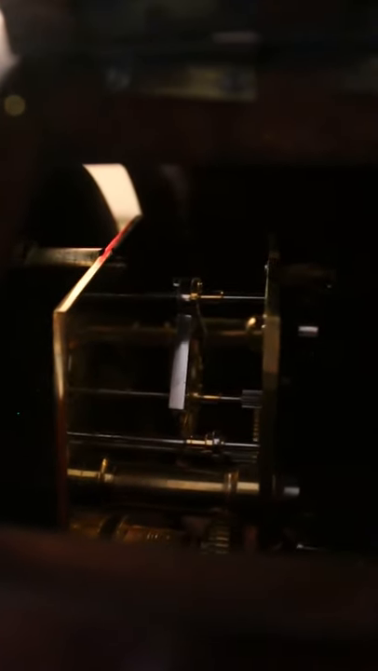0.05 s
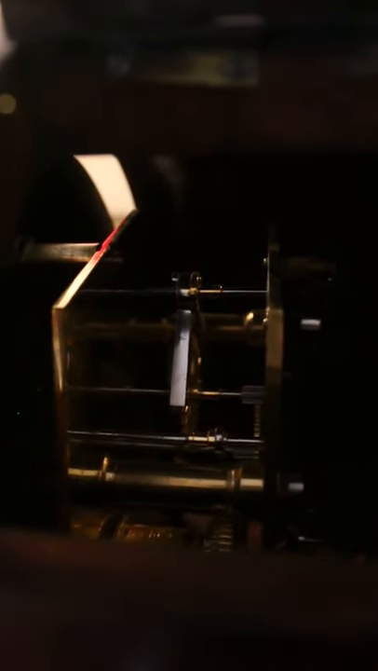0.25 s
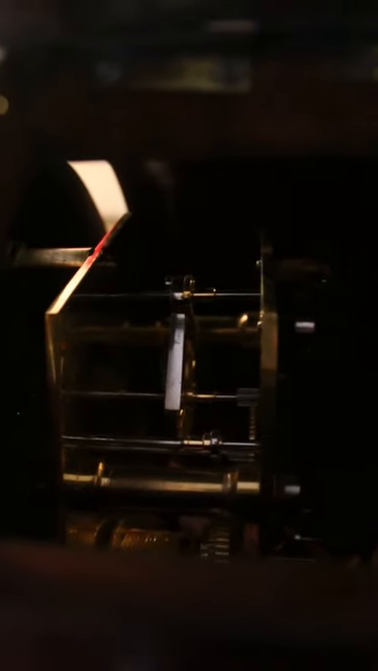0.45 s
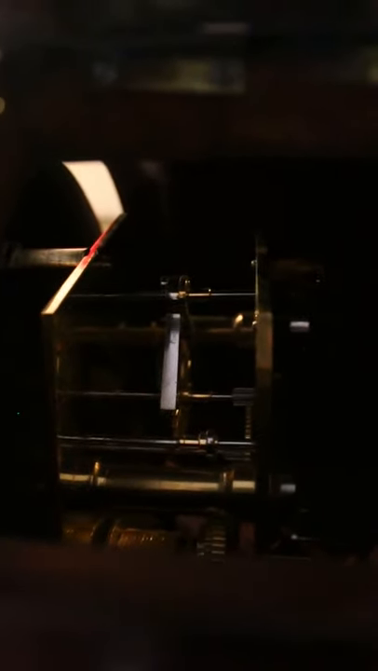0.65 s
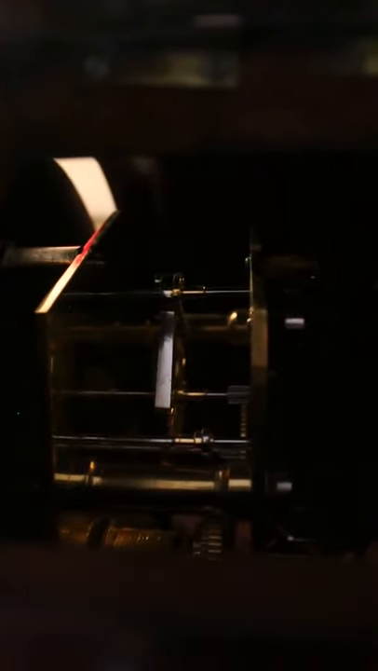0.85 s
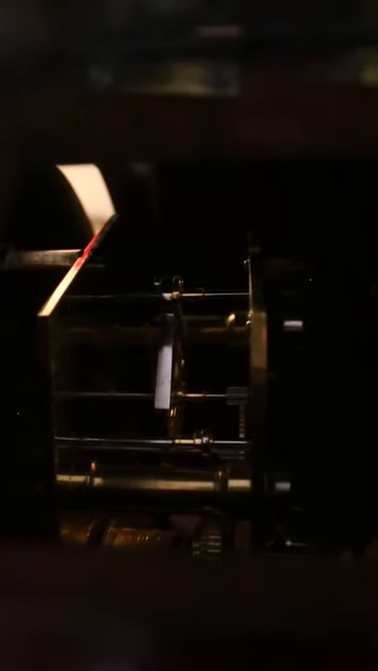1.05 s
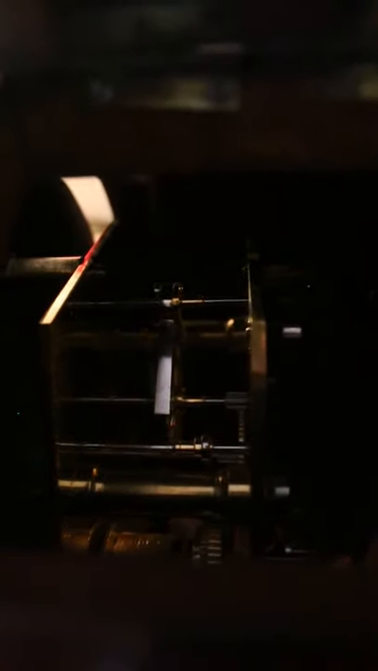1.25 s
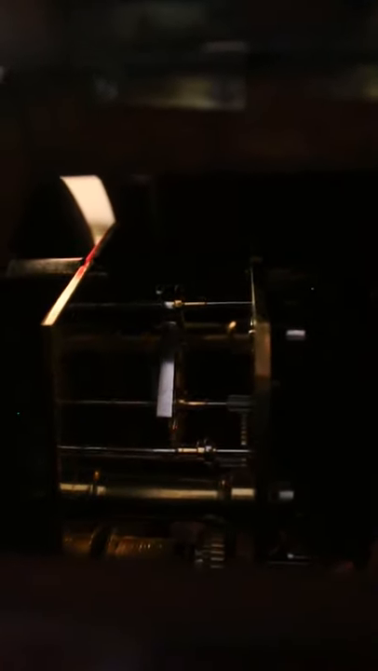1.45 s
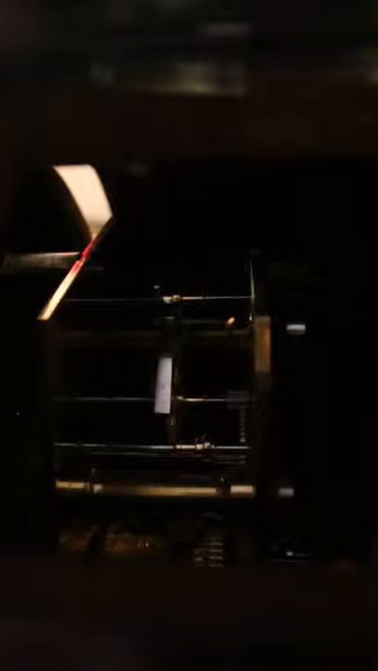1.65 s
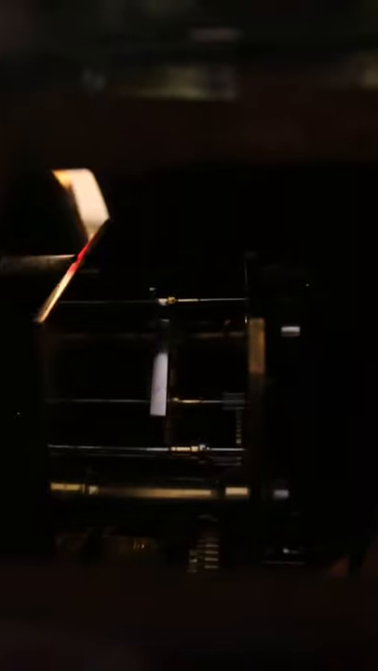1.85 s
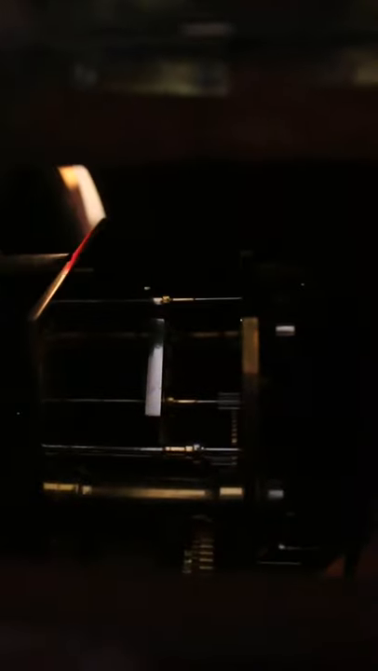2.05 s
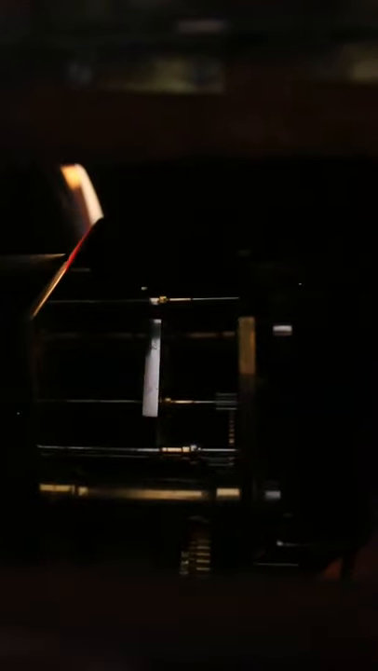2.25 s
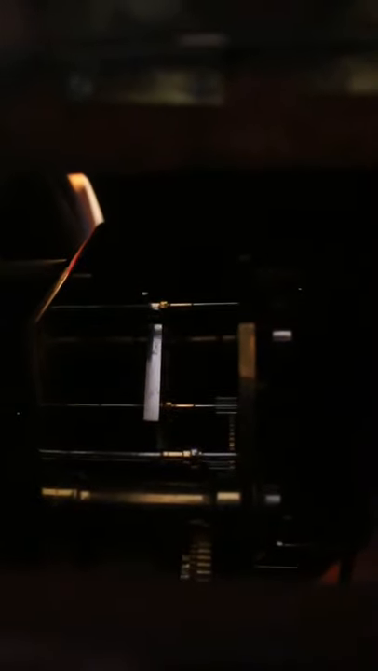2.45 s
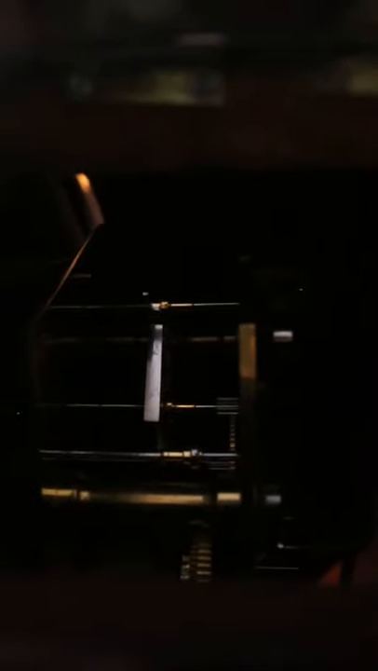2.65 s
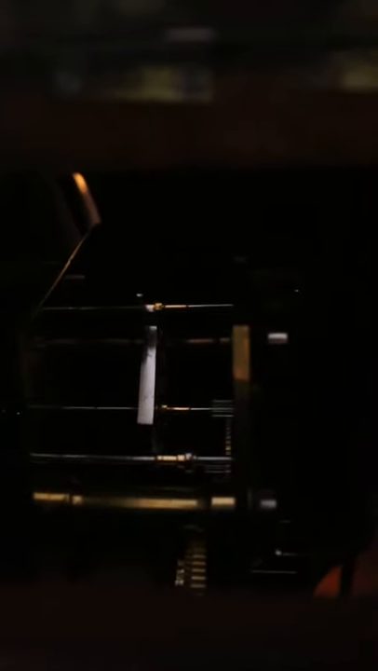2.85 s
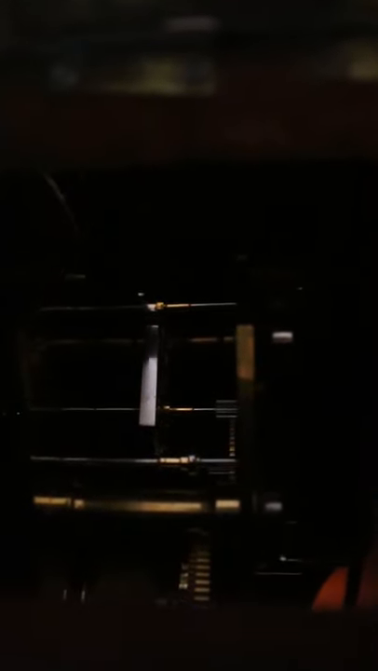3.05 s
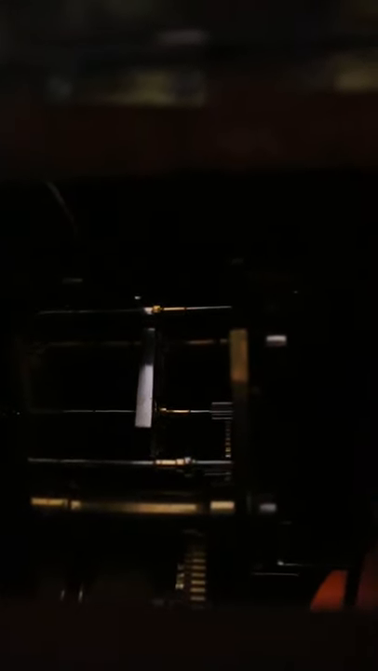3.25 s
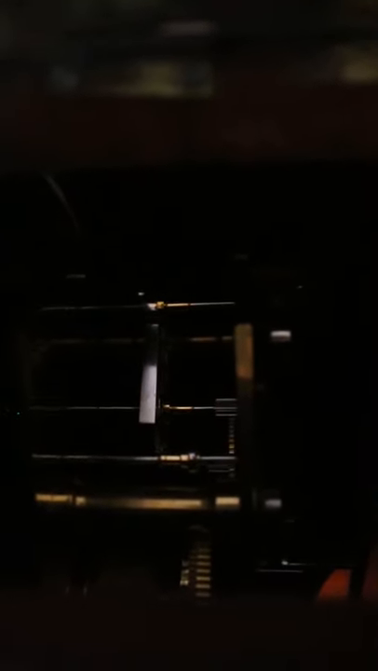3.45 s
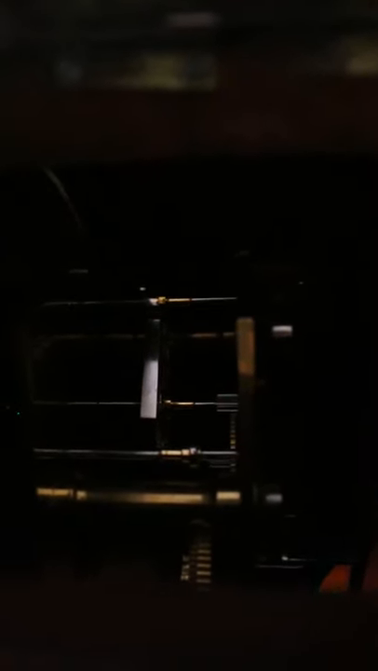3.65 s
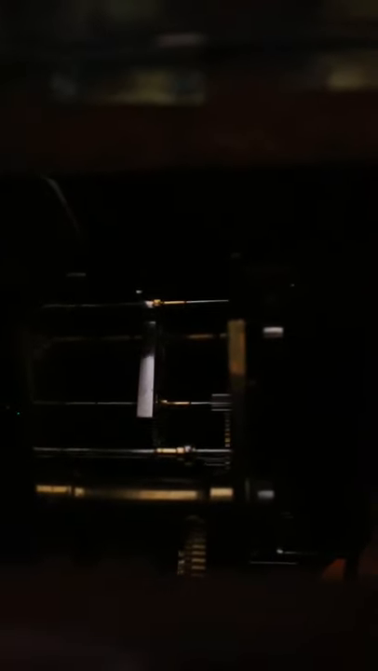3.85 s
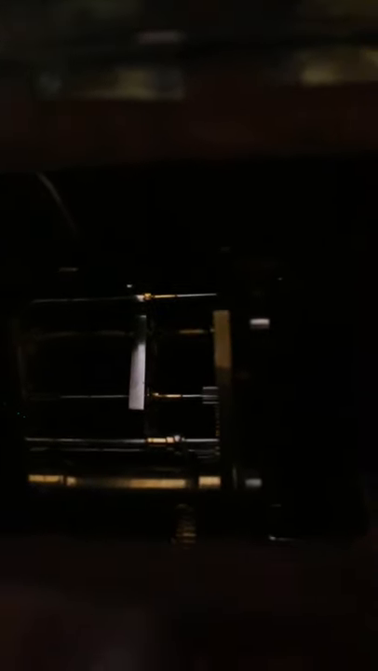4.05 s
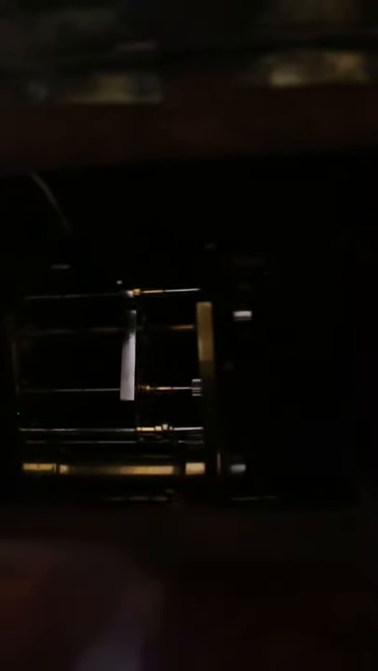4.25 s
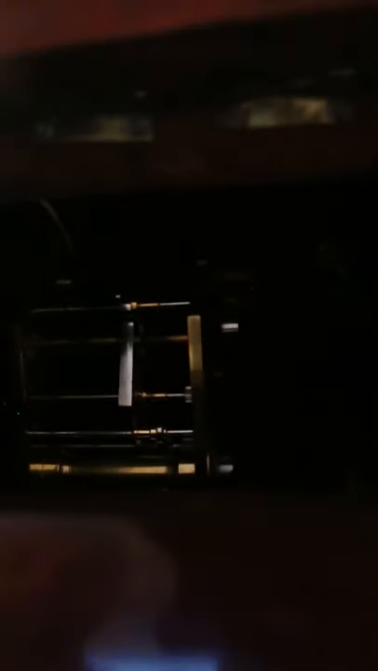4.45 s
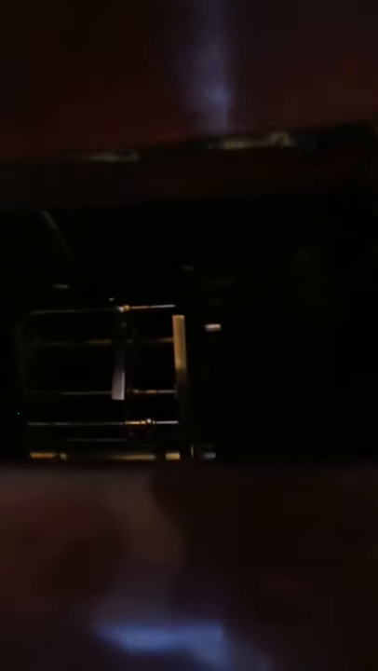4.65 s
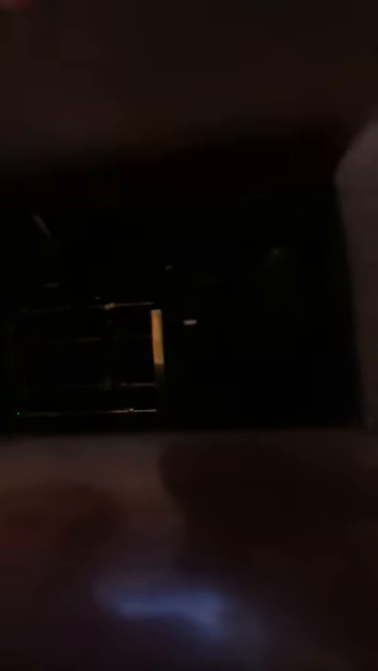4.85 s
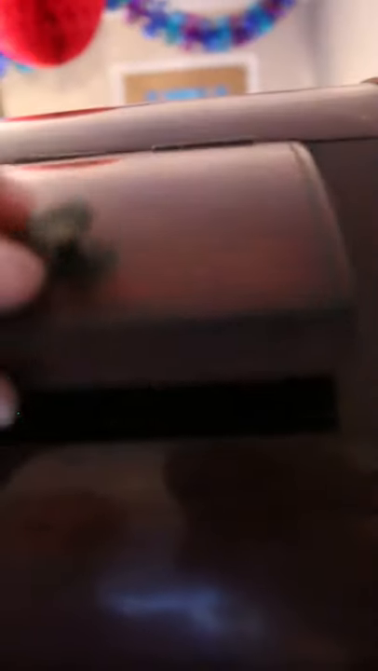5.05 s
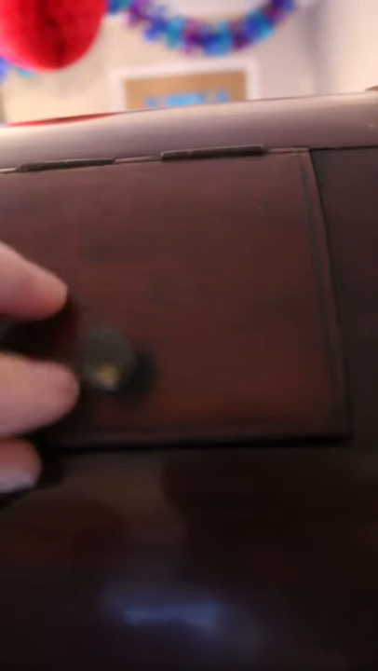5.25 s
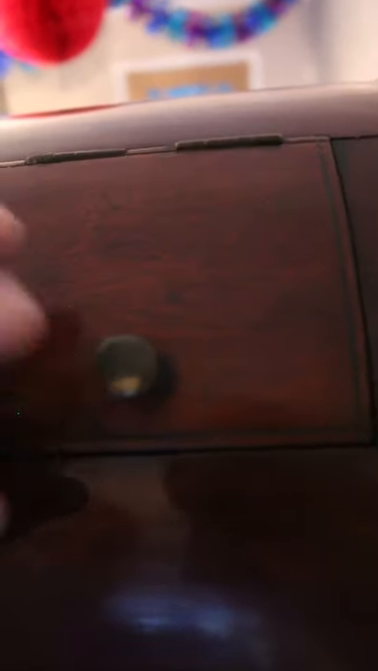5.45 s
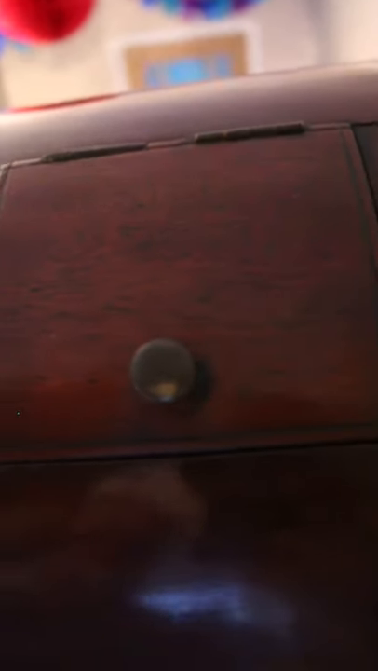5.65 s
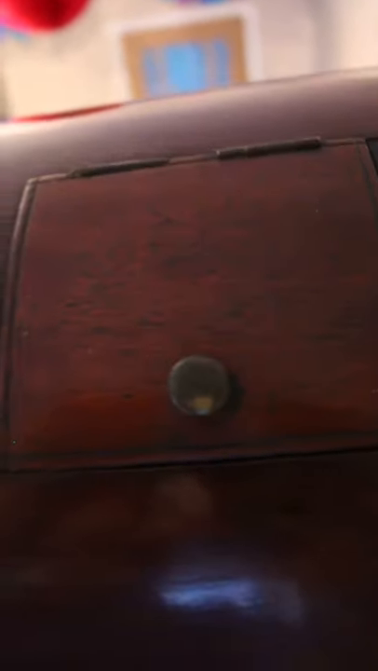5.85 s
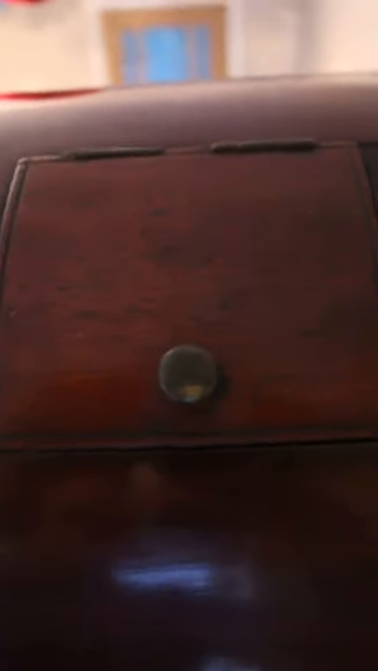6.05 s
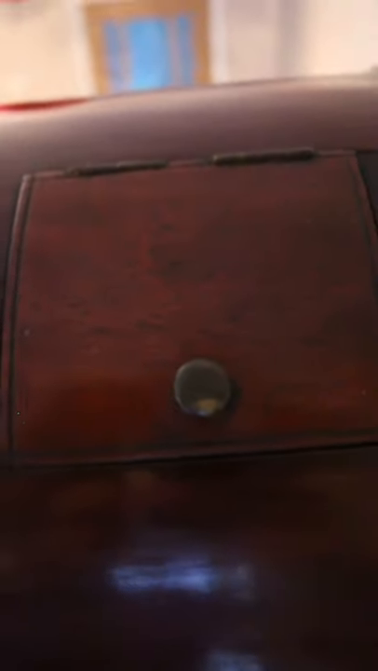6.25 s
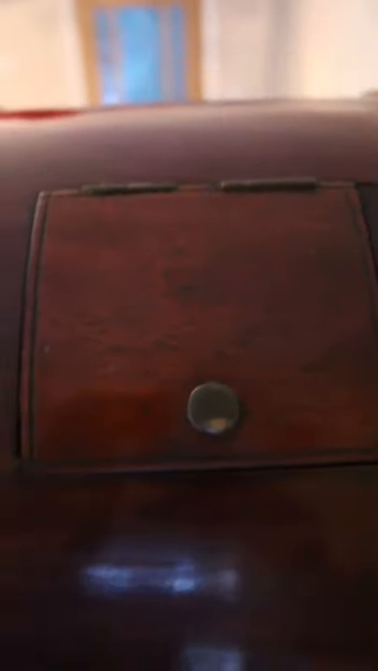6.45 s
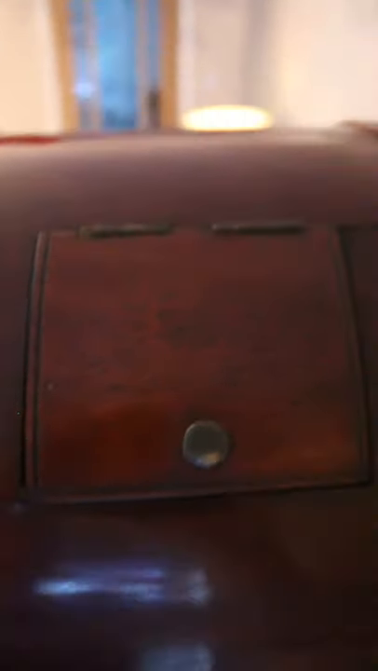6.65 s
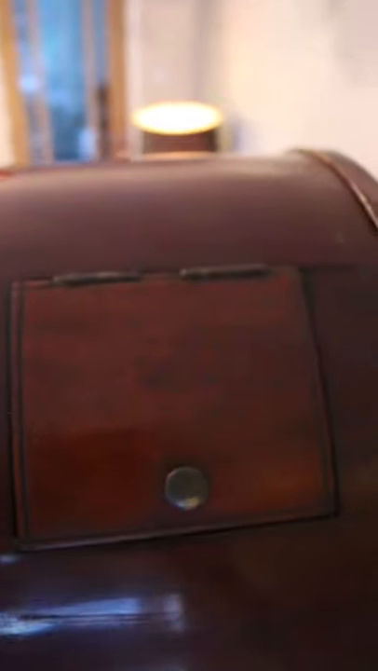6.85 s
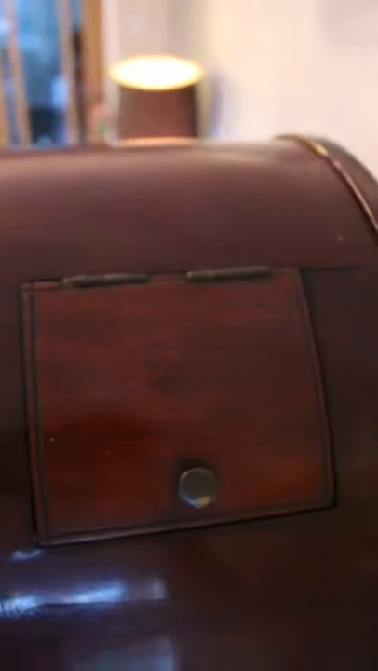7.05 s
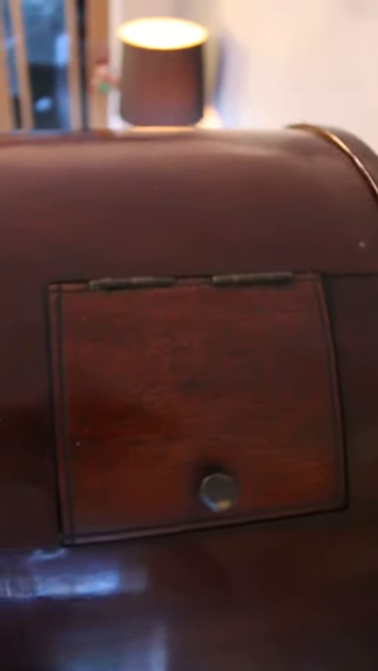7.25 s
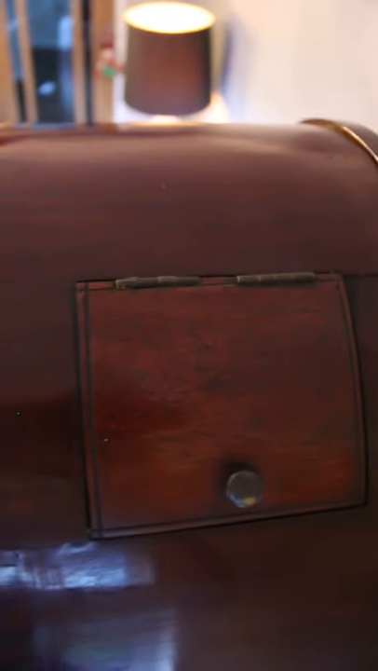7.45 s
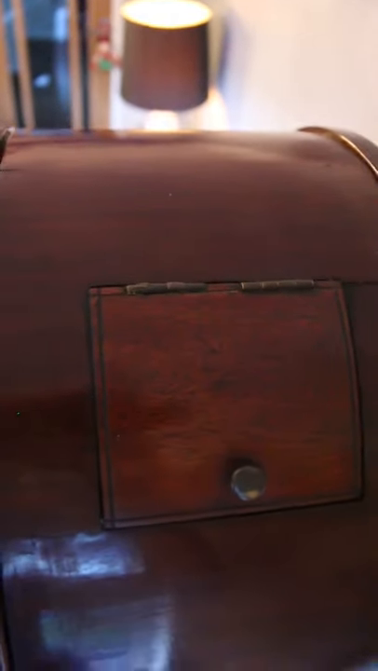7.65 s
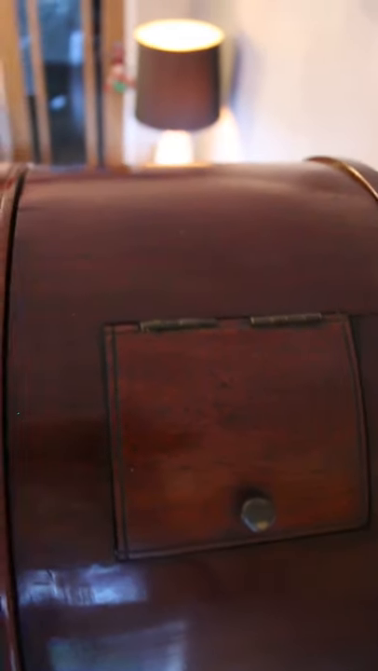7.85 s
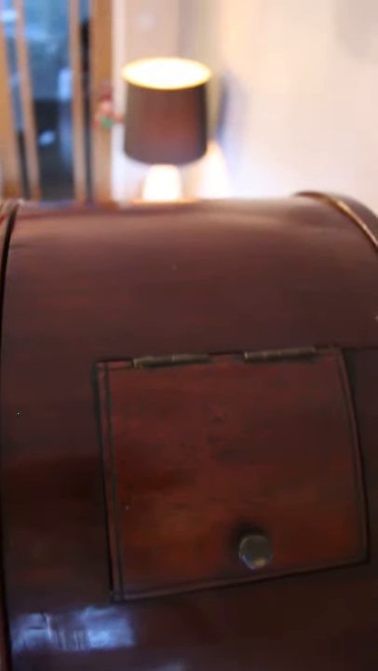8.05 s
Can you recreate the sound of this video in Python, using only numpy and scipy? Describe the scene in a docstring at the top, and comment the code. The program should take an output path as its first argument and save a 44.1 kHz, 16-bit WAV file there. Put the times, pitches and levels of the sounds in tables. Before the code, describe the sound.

A quiet indoor room with faint low rumble, hiss and a barely audible hum. From just outside an open wooden clock case, a soft, hollow tick with a faint metallic ring comes about every second from 0.2 s, every other beat slightly late. A sleeve rustles low at 0.3 and 2 s. Dull scuffing knocks hit the case at 2.7 s and lightly at 3.0 s, then a much stronger woody thump with a small rebound at 3.14 s. Cloth moves again from 4.3 s, with a small click at 4.8 s. A faint hinge squeak near 5.2 s leads into the hatch's loud, sharp wooden crack at 5.3 s, ringing briefly. The ticks go on weaker and duller. From 6.4 s fingers brush close by; clicks cluster around 6.9 s, the brightest at 6.95 s, and short rasping grip creaks recur from 7.05 s to the end near 8 s.

```python
"""A longcase clock ticks about once a second, heard from just outside the open hatch in its hood: each beat
is a noise pulse, damped modes of the movement and slowly swelling reflections.
Knocks on the wooden case are scuffs, thumps and case modes; the hatch then drops shut with a crack, its hinge
singing, and the ticks become weaker and duller. Sleeve, fingers and creaking grip add shaped noise, small clicks
and stick-slip pulses; air noise and a low hum lie beneath."""
import sys
import numpy as np
from scipy import signal
from scipy.fft import rfft, irfft, next_fast_len
from scipy.io import wavfile

SR = 44100
rng = np.random.default_rng(int(sys.argv[2]) if len(sys.argv) > 2 else 0)


def wav_out(sig):
    """Save sig, one row per channel (or a flat mono array), as 16-bit PCM at SR to the path in sys.argv[1]."""
    wavfile.write(sys.argv[1], SR, np.round(np.clip(np.atleast_2d(sig).T, -1, 1) * 32767).astype(np.int16))


N = 357651  # length of the scene in samples
AGE = np.arange(SR) / SR  # one second of time since a blow, in seconds

# Spectrum of the still room air and microphone hiss. Each row: frequency in Hz, relative level in dB.
AIR_SPECTRUM = [(15, -47.5), (25, -16), (69, -10.5), (101, -3.5), (122, -11), (160, -2), (178, -12.5),
                (368, -14), (614, -17.5), (666, -19), (762, -17), (1170, -20), (1660, -22.5), (6050, -27),
                (15500, -33.5)]
# Side against mid of the still air. Each row: frequency in Hz, ratio in dB.
AIR_WIDTH = [(110, -12), (200, -6), (700, -2), (2400, 0)]
AIR_DB = -56.21  # rms level
HUM_HZ, HUM_DB = 97, -68

# Reverberation of the room, before each source's length factor. Each row: frequency in Hz, t60 in seconds.
ROOM_T60 = [(60, 0.71), (130, 0.74), (300, 0.47), (1000, 0.44), (2500, 0.37), (6000, 0.37), (14000, 0.18)]
# Side against mid of the room's reflections. Each row: frequency in Hz, ratio in dB.
ROOM_WIDTH = [(60, -39.5), (200, -13), (400, -17), (700, -12.5), (1300, -7.5), (2400, -2), (4400, -1.5)]

# Low rustle of the sleeve, one curve for each movement of the arm, before the trim SLEEVE_DB.
# Each row of a curve: time in seconds, level in dB.
SLEEVE_CURVES = [
    [(0.33, -56.5), (0.998, -65), (1.054, -62), (1.17, -72)],
    [(1.7, -69), (2.0, -61), (2.03, -51.5), (2.18, -70)],
    [(4.32, -55.5), (4.714, -67.5), (4.778, -46), (5.05, -72)],
    [(6.65, -67), (6.736, -51), (6.836, -53), (6.88, -69)],
]
SLEEVE_DB, SLEEVE_HZ, SLEEVE_OCTAVES = -1, 205, 0.87
SLEEVE_RISE_OCTAVES_PER_S = .11  # later movements rustle brighter, as the arm draws back

# Clear strokes of the fingers. Each row: time of the height in seconds, length (standard deviation) in seconds,
# level in dB, centre in Hz, width (standard deviation) in octaves.
FINGER_STROKES = [(0.682, 0.028, -54.5, 824, 0.8), (6.455, 0.1, -54.5, 1080, 2.1),
                  (6.546, 0.031, -49, 1940, 1.54), (6.71, 0.035, -49.5, 863, 0.88),
                  (7.268, .028, -49.5, 555, 0.3), (7.661, .02, -51.5, 820, 0.31),
                  (7.805, 0.054, -53, 2910, 0.45)]

# Spells of creaking grip. Each row: start in seconds, end in seconds, first slip rate in Hz,
# typical peak of a slip in dB.
CREAK_SPELLS = [(7.053, 7.143, 70, -41), (7.286, 7.365, 103.1, -34.5), (7.408, 7.446, 111.8, -34.5),
                (7.489, 7.626, 90, -34), (7.791, 7.819, 71, -36.5), (7.958, 8.018, 73.2, -34),
                (8.058, 8.088, 47.65, -32)]
# Modes of the housing under the grip. Each row: frequency in Hz, mean level in dB, t60 in seconds.
HOUSING_MODES = [(688, -3.5, 0.019), (1046, -5, 0.011), (1488, 2.5, 0.0074), (2106, 3.5, 0.0087),
                 (2450, -3, 0.0087), (3310, -2.5, 0.0063), (3830, -5, 0.0065), (4680, -15, 0.0016),
                 (5630, -13, 0.0022)]
SLIP_RISE_OCTAVES_PER_S = 4  # once the grip gives, it slips ever faster

# Small clicks of fingers on wood and housing.
# Each row: start in seconds, peak in dB, treble tilt in dB per octave.
FINGER_CLICKS = [(4.782, -31, -2.5), (5.454, -28.5, -2), (6.234, -33, -0.5), (6.821, -35.5, -7.5),
                 (6.901, -28.5, -1.5), (6.9211, -23, -3.5), (6.947, -17.5, 2.5), (7.276, -28, -3.5),
                 (7.892, -31.5, 1.5)]
# Spectrum of a click before its tilt. Each row: frequency in Hz, relative level in dB.
CLICK_SPECTRUM = [(80, -25), (200, -2), (400, -1), (900, 12.5), (1400, 5.5), (2800, 9.5), (4500, 4.5),
                  (7000, -4), (15000, -7)]
CLICK_ROOM_DB = -12

# Modes of the hinge pin. Each row: frequency in Hz, relative level in dB, t60 in seconds.
HINGE_MODES = [(2970, -4.5, .025), (3620, 3, .016), (5540, -4, .02)]

# The hatch meets its frame and rebounds. Each row: start in seconds, level in dB, treble tilt in dB per octave.
SLAM_CONTACTS = [(5.3104, -28, -13), (5.3120, -13.5, -0.5), (5.3160, -23.5, 2.5), (5.325, -31, -6.5)]
# Spectrum of the slam before its tilt. Each row: frequency in Hz, relative level in dB.
SLAM_SPECTRUM = [(18, -44.5), (40, -21.5), (100, -11), (140, -5), (220, -15), (400, 1), (750, 3),
                 (1250, -3), (1800, -8), (2500, -17.5), (3600, -28), (5500, -40), (8000, -48.5),
                 (15000, -61)]
# Modes of the hatch panel and its brass knob. Each row: frequency in Hz, relative level in dB, t60 in seconds.
HATCH_MODES = [(396, -3, 0.062), (523, 3, 0.025), (818, 3.5, 0.037), (1123, 0.5, 0.041),
               (1350, -2.5, 0.017), (2980, -5.5, 0.015), (3145, -16, 0.023), (4980, -20.5, 0.011)]

# Modes of the wooden case. Each row: frequency in Hz, mean level in dB, t60 in seconds.
CASE_MODES = [(93.6, -5.5, .45), (157, -18, .5), (203, -14, 0.59), (292.8, 6.5, 0.47), (342.4, -9, 0.53),
              (426, -7.5, 0.53), (512, -8.5, 0.23), (610, -4, 0.33), (709, 1, 0.15), (747, -5, 0.4),
              (828, -6.5, 0.46), (1003, -1.5, 0.37), (1150, -14.5, 0.23), (1250, -10, 0.2),
              (1287, -1.5, 0.38), (1547, -8.5, 0.48), (1780, -20.5, 0.29)]
# Heavily damped modes of the side panel. Each row: frequency in Hz, relative level in dB, t60 in seconds.
PANEL_MODES = [(128.2, 2, 0.091), (225, 5.5, 0.05), (289.9, 1, 0.16), (390, -2.5, 0.043),
               (1028, -3.5, 0.14)]

# Knocks on the case. Each row: start in seconds, level in dB, treble tilt in dB per octave,
# thump against push in dB, length of the scrape before it in seconds, rebound against knock in dB.
KNOCKS = [(2.733, -30, -5, 4.5, 0.0099, -3), (3.024, -36.5, -1, 5, 0.0073, -9.5),
          (3.068, -38, -1, 2, .011, -2), (3.137, -16.5, -0.1, 3.5, .031, -11.5)]
# Spectrum of a knock before its tilt. Each row: frequency in Hz, relative level in dB.
KNOCK_SPECTRUM = [(18, -48.5), (40, -7.5), (100, -0.5), (170, 0.5), (290, -3.5), (450, -4.5), (1000, -10),
                  (2000, -19.5), (3200, -24.5), (6000, -40), (9000, -57.5), (15000, -64)]
# Grazing contacts that lead into a knock. Each row: share of the scrape still to come, level against the knock in dB.
GRAZES = [(1, -8.5), (.44, -2)]
GRAZE_TILT_DB, GRAZE_THUMP_DB = 3, -9  # a graze is brighter and has little weight
REBOUND_S, REBOUND_TILT_DB, REBOUND_THUMP_DB = 0.034, -4.5, 1  # the rebound is duller than the knock

# Modes of the movement and seat board. Each row: frequency in Hz, mean level in dB, t60 in seconds.
MOVEMENT_MODES = [(294, -2, 0.35), (437.6, -3, 0.52), (485, -1.5, 0.42), (598, -4.5, 0.51),
                  (757, -4.5, 0.18), (1009, 2.5, 0.33), (1026, -7, 0.44), (1110, -1.5, 0.19),
                  (1840, -14.5, 0.37), (2177, -5, 0.32), (2990, -18, 0.51), (5800, -30, .4)]
# Spectrum of a beat before its tilt. Each row: frequency in Hz, relative level in dB.
BEAT_SPECTRUM = [(150, -22), (330, -10), (470, 7.5), (780, -3), (1080, -1), (1500, -8.5), (2300, -11.5),
                 (3800, -25.5), (6500, -31.5), (15000, -47.5)]
# An even spectrum. Each row: frequency in Hz, relative level in dB.
FLAT_SPECTRUM = [(1000, 0)]
# The two pallets take turns. Each row: level in dB and treble tilt in dB per octave, both with the hatch open,
# ring against hood in dB.
PALLETS = [(-41, -0.4, 2), (-42, -0.9, -2.5)]
# the pendulum swings evenly, but every second beat comes late; the limp slowly evens out
FIRST_BEAT_S, BEAT_S, LIMP_S, LIMP_SAG_S_PER_S = .193, 1.0021, .029, .003
# from this time on the lowered hatch makes the beats weaker and duller (tilt in dB per octave)
HATCH_DOWN_S, MUFFLE_DB, MUFFLE_TILT_DB = 5.1, -3.5, -2.1

TOP_HZ = 15800  # upper band edge


def undb(db):
    """Amplitude ratio: twenty decibels are a factor of ten."""
    return 10 ** (np.asarray(db) / 20)


def along(points, hz):
    """Linear interpolation of (Hz, value) points over log frequency."""
    f, value = np.transpose(points)
    return np.interp(np.log(hz + 1e-3), np.log(f), value)


def unit(x):
    """Energy normalisation: unit mean energy per channel."""
    return x / np.sqrt(np.sum(x ** 2) / len(np.atleast_2d(x)))


def level(x, db):
    """Onset level: set the rms of the first twentieth of a second."""
    return x * undb(db) / np.sqrt(np.mean(x[..., :SR // 20] ** 2))


def add(out, s, x):
    """Superposition: add a sound to the scene at time s."""
    i = int(s * SR)
    out[:, i:i + x.shape[-1]] += x[..., :N - i]


def colour(x, points, tilt_db=0):
    """Minimum-phase filtering: folding the cepstrum makes a given spectrum causal; the tilt pivots at 1 kHz."""
    n = 2 * next_fast_len(x.shape[-1])
    hz = np.fft.rfftfreq(n, 1 / SR)
    octaves = np.log2(np.clip(hz, 200, 12000) / 1000)
    cepstrum = irfft(np.log(undb(along(points, hz) + tilt_db * octaves)))
    cepstrum[1:n // 2] *= 2
    cepstrum[n // 2 + 1:] = 0
    response = np.exp(rfft(cepstrum))
    return irfft(rfft(x, n) * response)[..., :x.shape[-1]]


def diffuse(size, width=ROOM_WIDTH):
    """Diffuse-field coherence: noise that is alike in both channels in the bass and less so in the treble."""
    mid, side = rng.standard_normal((2, size))
    return mid + np.array([[1], [-1]]) * colour(side, width)


def wander(t, points):
    """Slow random variation: straight lines between evenly spaced normal draws."""
    return np.interp(t, np.linspace(0, t[-1], num=points), rng.standard_normal(size=points))


def ring(modes, scatter=0, swell=.01):
    """Modal superposition: damped sines build up over `swell` cycles; the place of the blow scatters them."""
    hz, db, t60 = np.transpose(modes)[:, :, None]
    size = undb(db + scatter * rng.standard_normal(hz.shape))
    if scatter:
        size = size * rng.choice([-1, 1], hz.shape)
    build_up = 1 - np.exp(-AGE * hz / swell)
    decay = np.exp(-np.log(1000) * AGE / t60)
    return unit(np.sum(size * build_up * decay * np.sin(2 * np.pi * hz * AGE), axis=0))


def room(build_s, length=1):
    """Statistical reverberation: noise bands build up together and decay each at its own rate, the bass slowest."""
    noise, hz = rfft(diffuse(SR)), np.fft.rfftfreq(SR, 1 / SR)
    centres, t60 = np.transpose(ROOM_T60)
    tail = 0
    for share, t in zip(np.eye(len(centres)), t60):  # overlapping bands that sum to the whole
        band = irfft(noise * along(np.c_[centres, share], hz), SR)
        tail = tail + band * np.exp(-np.log(1000) * AGE / (t * length))
    return unit(tail * (1 - np.exp(-AGE / build_s)))


def air():
    """Stationary noise: faint rumble and hiss, with a low hum whose phase wavers."""
    noise = colour(diffuse(N, AIR_WIDTH), AIR_SPECTRUM)
    t = np.arange(N) / SR
    hum = np.sqrt(2) * np.sin(2 * np.pi * HUM_HZ * t + wander(t, 60))
    return undb(AIR_DB) * noise / noise.std() + undb(HUM_DB) * hum


def rub(centre_hz, octaves):
    """Sliding friction: one second of noise, grainy in steps of about 2.3 ms, in a soft-edged band."""
    hz = np.fft.rfftfreq(SR, 1 / SR)
    grain = undb(3 * np.repeat(rng.standard_normal(SR // 100), 100))
    band = np.exp(-.5 * (np.log2((hz + 1) / centre_hz) / octaves) ** 2) / np.sqrt(hz + centre_hz)
    noise = irfft(rfft(diffuse(SR) * grain) * band, SR)
    return noise / noise.std()


def sleeve():
    """Cloth friction: a low band of noise follows each movement of the arm."""
    out = np.zeros((2, N))
    for curve in SLEEVE_CURVES:
        s, db = np.transpose(curve)
        swell = undb(np.interp(s[0] + AGE, s, db + SLEEVE_DB, right=-np.inf))
        centre_hz = SLEEVE_HZ * 2 ** (SLEEVE_RISE_OCTAVES_PER_S * s[0])
        add(out, s[0], swell * rub(centre_hz, SLEEVE_OCTAVES))
    return out


def brushes():
    """Skin friction: fingers slide over the housing in short, grainy swells."""
    out = np.zeros((2, N))
    for s, length_s, db, centre_hz, octaves in FINGER_STROKES:
        swell = np.exp(-.5 * ((AGE - .5) / length_s) ** 2)
        add(out, s - .5, undb(db) * swell * rub(centre_hz, octaves))
    return out


def creak():
    """Stick-slip: every slip of the grip excites the housing and reaches the right port first."""
    out = np.zeros((2, N))
    size = SR // 20
    for start, end, first_hz, db in CREAK_SPELLS:
        s = start
        body = unit(ring(HOUSING_MODES, scatter=0.53, swell=2.6)[:size])
        for late, strength, tilt in rng.standard_normal((20, 3)):
            if s < end:
                snap = unit(rng.standard_normal(size) * np.exp(-AGE[:size] / .0008))
                # frequency in Hz, relative level in dB
                slip = colour(body + undb(-5.0) * snap, [(6500, 5), (10000, -12), (15000, -9)], 1.9 * tilt)
                left = undb(-2.5) * np.roll(slip, int(.00006 * SR))
                ports = np.array([left, slip])
                add(out, s, undb(db + 1.0 * strength) * ports / np.abs(slip).max())
            rate_hz = first_hz * 2 ** (SLIP_RISE_OCTAVES_PER_S * (s - start))
            s += np.exp(.04 * late) / rate_hz
    walls = signal.fftconvolve(out, room(build_s=0.0034, length=0.38), axes=1)[:, :N]
    return out + undb(-12) * walls


def clicks():
    """Hard impact: little contacts close to the microphone, each a few milliseconds of clatter."""
    out = np.zeros((2, N))
    for s, db, tilt_db in FINGER_CLICKS:
        snap = unit(diffuse(SR) * np.exp(-AGE / 0.0032))
        walls = undb(CLICK_ROOM_DB) * room(build_s=0.0019, length=0.92)
        click = colour(snap + walls, CLICK_SPECTRUM, tilt_db)
        add(out, s, undb(db) * click / np.abs(click).max())
    return out


def hinge(s=5.18, length_s=0.077, db=-61):
    """Friction-driven resonance: the dry hinge sings, catching and letting go, while the hatch swings down."""
    t = np.arange(N) / SR
    grip = undb(2.5 * wander(t, 400))
    song = signal.fftconvolve(diffuse(N) * grip, ring(HINGE_MODES)[None])[:, :N]
    return undb(db) * song / song.std() * np.exp(-.5 * ((t - s) / length_s) ** 2)


def hatch():
    """Impact of a panel on its frame: a crack excites the hatch; case and room carry the blow on."""
    out = np.zeros((2, N))
    for s, db, tilt_db in SLAM_CONTACTS:
        crack = unit(colour(diffuse(SR) * np.exp(-AGE / 0.0034), SLAM_SPECTRUM, tilt_db + 0.94))
        panel = ring(HATCH_MODES, swell=0.8)
        wood = unit(colour(ring(CASE_MODES, scatter=0.65), SLAM_SPECTRUM, tilt_db))
        walls = unit(colour(room(build_s=0.032, length=0.95), SLAM_SPECTRUM, tilt_db + 0.79))
        blow = undb(-2.5) * crack + panel + undb(-2.5) * wood + undb(-3) * walls
        add(out, s, -level(blow, db))  # inverted polarity
    return out


def contacts():
    """Repeated contact: every knock scrapes in, lands and rebounds once; yields time, level, tilt and thump."""
    for s, db, tilt_db, thump_db, scrape_s, rebound_db in KNOCKS:
        for share, graze_db in GRAZES:
            yield s - share * scrape_s, db + graze_db, tilt_db + GRAZE_TILT_DB, thump_db + GRAZE_THUMP_DB
        yield s, db, tilt_db, thump_db
        yield s + REBOUND_S, db + rebound_db, tilt_db + REBOUND_TILT_DB, thump_db + REBOUND_THUMP_DB


def bumps():
    """Soft impact: dull, scuffing contacts excite the side panel, the case and the room."""
    out = np.zeros((2, N))
    panel = ring(PANEL_MODES, swell=1.65)
    for s, db, tilt_db, thump_db in contacts():
        scuff = unit(diffuse(SR) * AGE * np.exp(-AGE / 0.0039))
        push = scuff + undb(1.5) * room(build_s=0.0078, length=0.9)
        push = unit(colour(push, KNOCK_SPECTRUM, tilt_db))
        thump = unit(colour(panel, KNOCK_SPECTRUM, tilt_db))
        wood = unit(colour(ring(CASE_MODES, scatter=1, swell=1.5), KNOCK_SPECTRUM, tilt_db))
        add(out, s, level(push + undb(thump_db) * thump + undb(-2.0) * wood, db))
    return out


def escapement():
    """Impact and resonance: a tooth drops on its pallet; movement and hood swell after it, the low notes last."""
    out = np.zeros((2, N))
    for beat, due in enumerate(np.arange(FIRST_BEAT_S, N / SR, BEAT_S)):
        s = due + beat % 2 * (LIMP_S - LIMP_SAG_S_PER_S * due)
        db, tilt_db, ring_db = PALLETS[beat % 2]
        if s > HATCH_DOWN_S:
            db, tilt_db = db + MUFFLE_DB, tilt_db + MUFFLE_TILT_DB
        drop = unit(colour(diffuse(SR) * AGE * np.exp(-AGE / 0.008), BEAT_SPECTRUM, tilt_db + 4.0))
        hood = unit(colour(room(build_s=0.0097, length=0.95), BEAT_SPECTRUM, tilt_db))
        metal = unit(colour(ring(MOVEMENT_MODES, scatter=2.7, swell=6), FLAT_SPECTRUM, tilt_db))
        add(out, s, level(undb(-9) * drop + hood + undb(ring_db) * metal, db))
    return out


def scene():
    """Linear superposition of air, hand, hatch, case and clock."""
    hand = sleeve() + brushes() + creak() + clicks()
    return air() + hand + hinge() + hatch() + bumps() + escapement()


def record(dry):
    """Saturation and band limiting: the recorder rounds the highest peaks and cuts the top."""
    low_pass = signal.ellip(10, .2, 80, TOP_HZ, fs=SR, output="sos")
    return signal.sosfilt(low_pass, np.tanh(dry))


dry = scene()
out = record(dry)
wav_out(out)
```